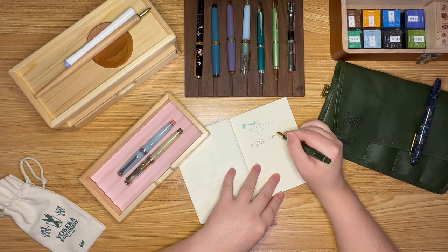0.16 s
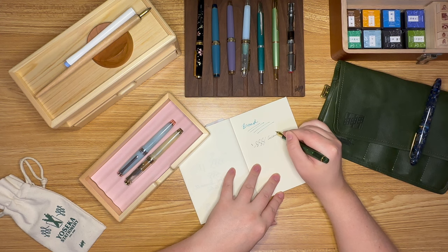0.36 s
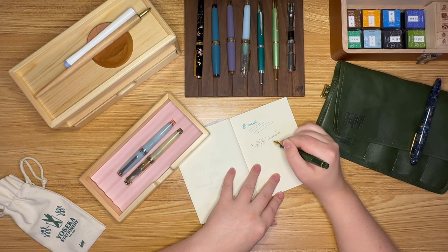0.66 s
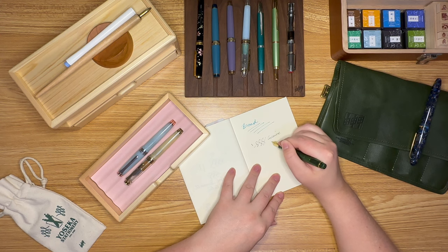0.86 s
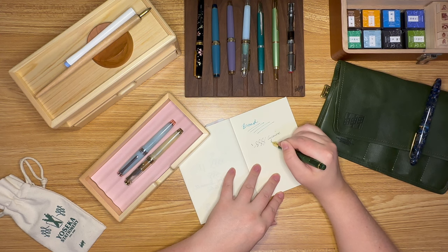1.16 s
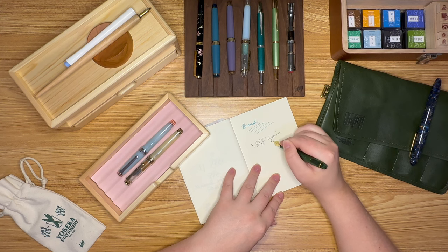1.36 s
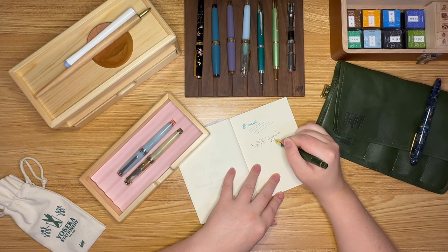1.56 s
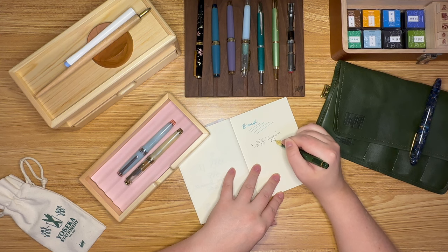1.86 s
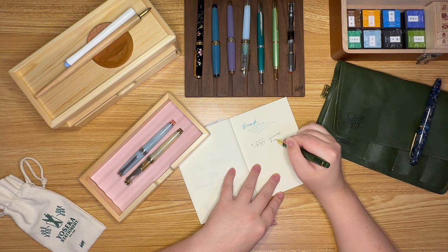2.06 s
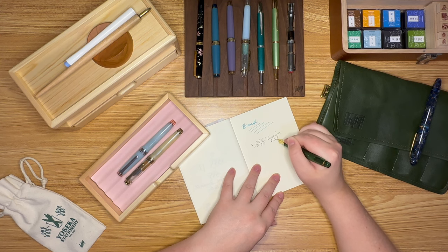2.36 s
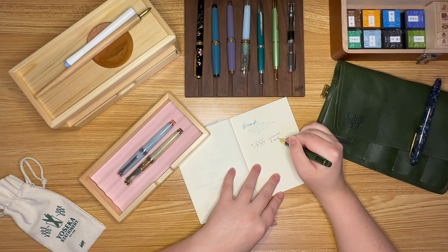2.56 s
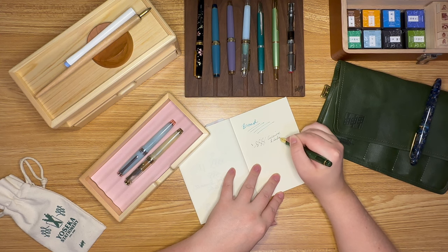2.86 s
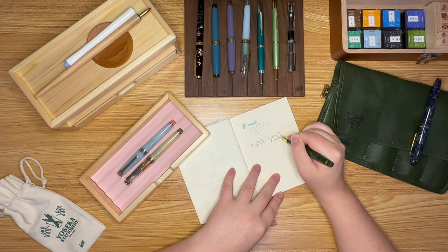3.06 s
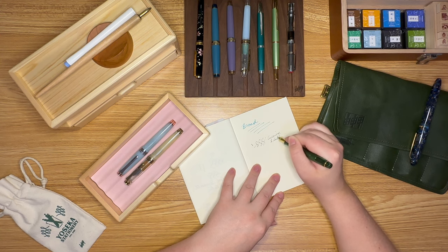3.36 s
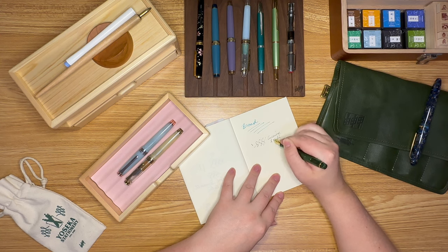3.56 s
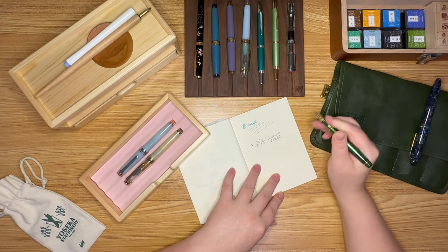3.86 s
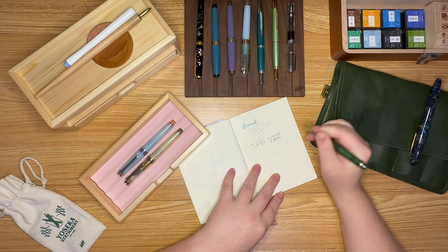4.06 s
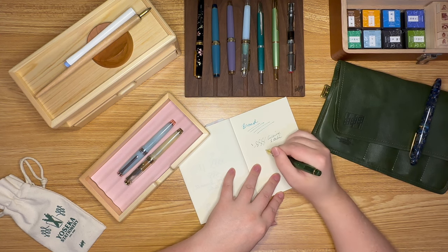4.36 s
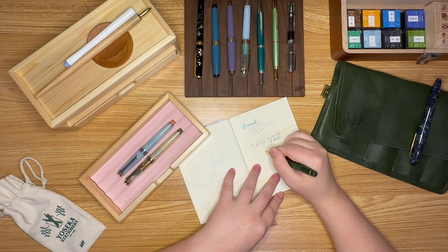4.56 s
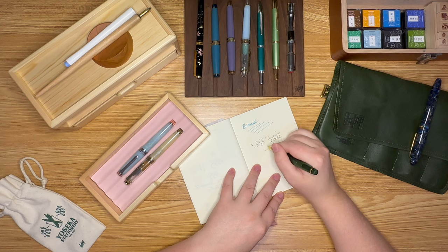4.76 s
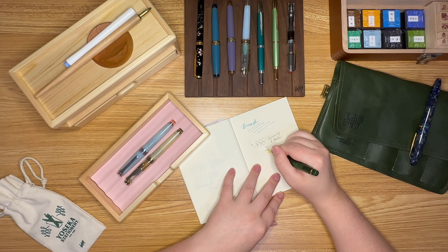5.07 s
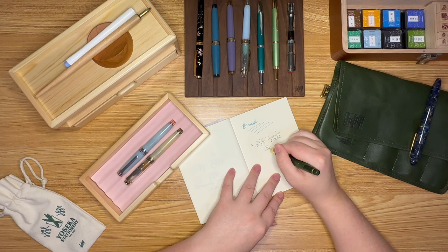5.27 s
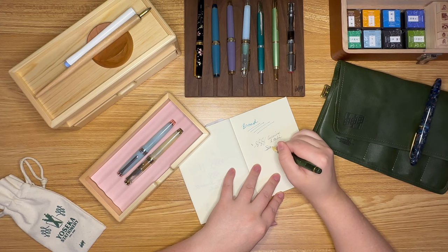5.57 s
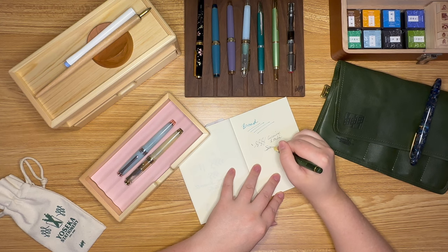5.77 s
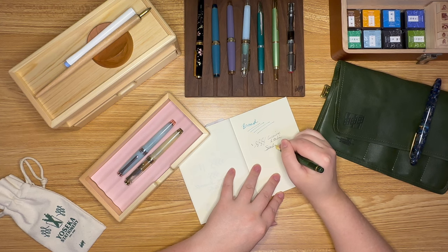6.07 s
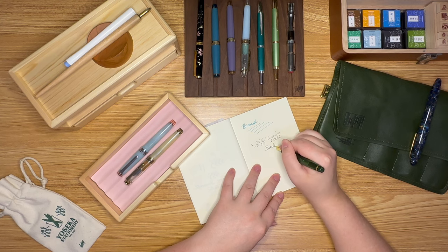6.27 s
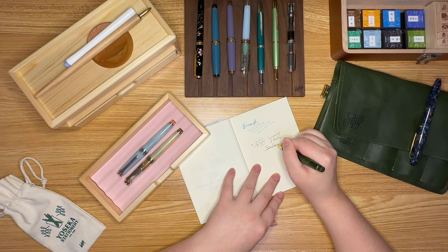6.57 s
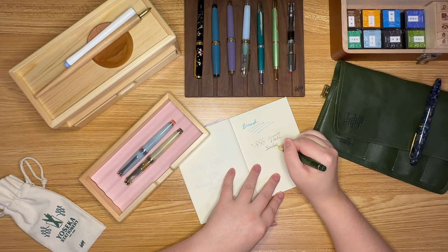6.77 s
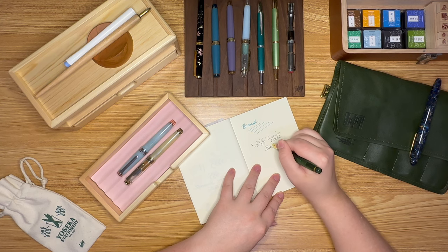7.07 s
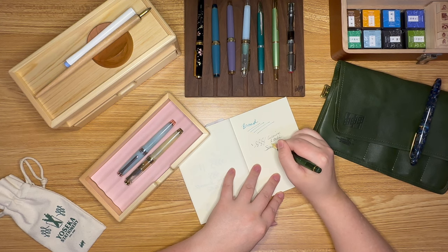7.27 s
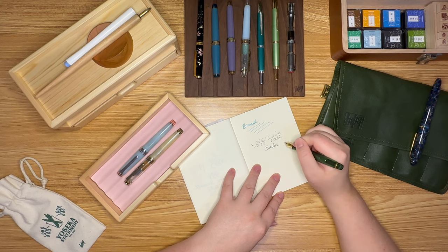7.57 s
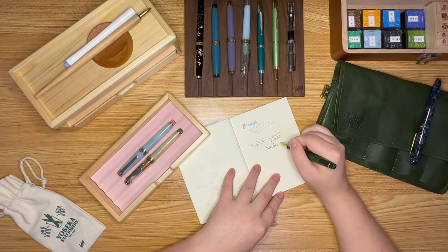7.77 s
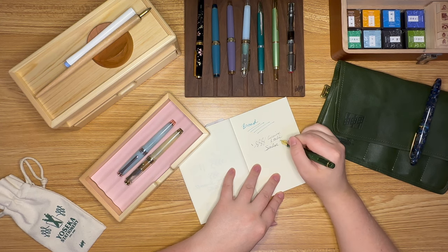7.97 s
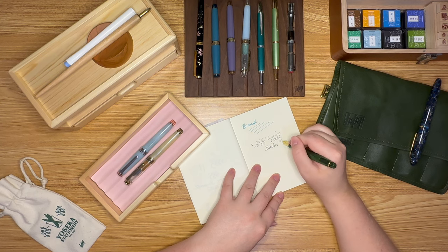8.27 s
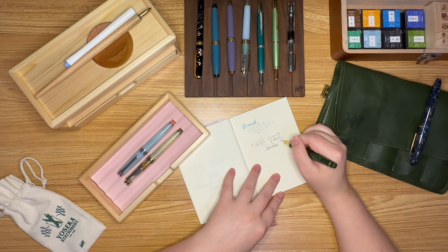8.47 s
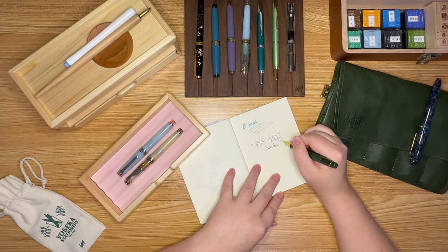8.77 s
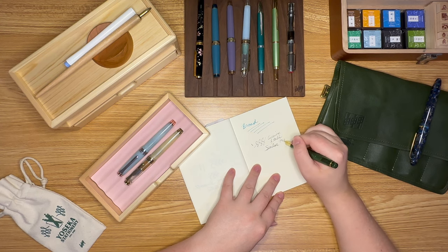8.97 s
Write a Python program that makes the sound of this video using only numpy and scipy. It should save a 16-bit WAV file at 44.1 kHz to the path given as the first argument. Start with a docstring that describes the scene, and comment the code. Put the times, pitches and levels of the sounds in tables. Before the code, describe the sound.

A pen nib scratches short strokes on notebook paper in a quiet room with a low fan hum, dull knocks and a brief dropout.

```python
"""A steel nib writes in a notebook on a wooden desk, in a quiet room with a humming fan throughout.
First come short scratchy strokes among dull knocks of pen and knuckles, then the hand slides over the page.
A second run of strokes follows, with another slide; near 7.5 s the sound drops out with a pop.
It soon returns, and strokes continue to the end. Random clicks, for the nib tripping over paper fibres,
ring the nib, page and desk; knocks are fading tones, slides are rubbing clicks, the fan is sine tones."""
import sys
import numpy as np
from scipy import signal
from scipy.fft import rfft, irfft, next_fast_len
from scipy.io import wavfile
from scipy.ndimage import uniform_filter1d

SR = 44100
rng = np.random.default_rng(int(sys.argv[2]) if len(sys.argv) > 2 else 0)


def master(y):
    """Save y as 16-bit WAV."""
    cut = np.clip(np.atleast_2d(y).T, -1, 1)
    pcm = np.round(cut * 32767)  # scale
    wavfile.write(sys.argv[1], SR, pcm.astype(np.int16))


N = 402626  # length in samples

# Tones from the turning fan shaft. Each row: multiple of the turning rate, average level in dB.
SHAFT_TONES = [(1.037, -47), (2, -63.5), (2.98, -56), (4.03, -58), (4.957, -56), (6.08, -55), (6.97, -53.5),
               (10.96, -51.5), (13, -58), (14.16, -71.5), (9.14, -62.5), (16.15, -65), (18, -67),
               (22.1, -72), (25.7, -78.5), (27.3, -77.5), (29.1, -81)]
SHAFT_HZ = 14.071  # turning rate
# Tones from a second motor and the mains. Each row: pitch in Hz, average level in dB.
MOTOR_AND_MAINS = [(17.65, -51.5), (35.29, -67), (119.97, -57), (257.6, -65), (479.9, -74), (608.3, -72)]
# Moving air and microphone hiss. Each row: frequency in Hz, level in dB per Hz.
AIR_COLOUR = [(10, -73.5), (30, -81), (60, -74.5), (125, -67), (160, -76), (240, -78), (290, -88.5),
              (450, -89), (610, -90.5), (720, -92.5), (1500, -99), (3000, -106), (7000, -112),
              (15000, -114)]

# The hand sliding over the page, one list per slide. Each row: time in seconds, level in dB.
HAND_SLIDES = [
    [(3.64, -75), (3.7, -60), (3.8, -63), (3.9, -64.5), (4.0, -64.5), (4.05, -59), (4.12, -71), (4.24, -73),
     (4.28, -63), (4.4, -78)],
    [(6.84, -81), (7.0, -71), (7.2, -63.5), (7.3, -67), (7.4, -59.5), (7.5, -67), (7.72, -69.5),
     (7.85, -86)],
]
# The page resonance under each slide. Each entry: pitch in Hz.
SLIDE_PAGE_HZ = [1914, 1530]
# Resonances of skin on paper. Each row: centre in Hz, width in Hz, relative level in dB.
SKIN_MODES = [(1070, 1440, 3), (2530, 600, -1), (4530, 4300, -12)]

# Pen and knuckles touching down. Each row: start in seconds, level in dB,
# sharp tick setting in dB against that level, knock pitch in Hz.
TOUCHES = [(0.248, -40, -23, 1010), (0.259, -38, -25, 910), (0.788, -48.5, -21, 910),
           (1.313, -47.5, -20, 850), (2.901, -35, -31, 1400), (3.159, -43, -17, 1160),
           (3.288, -57, -21, 610), (3.539, -45.5, -19, 810), (3.66, -43.5, -2, 1480),
           (3.673, -41, -11, 1580), (3.771, -54.5, -9, 2620), (3.994, -53, -18, 1920),
           (4.036, -54, -31, 905), (4.052, -41.5, -31, 686), (4.558, -47, -17, 900),
           (4.689, -49, -7.5, 4260), (6.704, -44, -22, 1630), (7.346, -53.5, -13, 4170)]

# Pen strokes; heavy ones load the desk and damp the nib. Each row: middle in seconds,
# length in seconds, page level in dB, relative pressure in dB.
PEN_STROKES = [(0.005, 0.034, -48, 0.5), (0.892, 0.073, -54.5, 1.5), (0.968, 0.039, -56, -2.5),
               (1.067, 0.073, -53.5, 2), (1.165, 0.041, -57, -1.5), (1.406, .091, -51, -2.5),
               (1.562, 0.086, -53.5, 0), (1.677, 0.085, -57, -2), (1.805, 0.098, -59.5, 0),
               (1.926, 0.067, -58.5, -1.5), (2.123, .108, -51, 0), (2.294, 0.085, -49.5, 2),
               (2.403, 0.056, -53, -0.5), (2.529, 0.035, -56, 5.5), (2.641, 0.059, -53, -0.5),
               (2.81, .068, -61, 2), (2.896, 0.049, -52, 5), (2.936, 0.049, -46.5, 0),
               (3.24, 0.096, -65.5, 1.5), (3.606, 0.048, -45.5, 1), (4.668, 0.093, -47, -2),
               (4.752, 0.1, -46, -1.5), (4.871, 0.051, -40, 1.5), (4.972, 0.1, -50, -1.5),
               (5.1, 0.089, -48.5, -4.5), (5.247, 0.11, -52.5, -0.5), (5.355, 0.065, -49, -3),
               (5.472, 0.053, -50, 2), (5.554, .076, -54, -5), (5.693, 0.075, -51, 1.5),
               (5.793, 0.071, -45, -1.5), (5.942, 0.078, -47, -0.5), (6.036, 0.082, -52.5, -3.5),
               (6.163, .067, -56, -2.5), (6.219, 0.065, -54, 3), (6.281, 0.071, -53, -4),
               (6.33, .072, -53.5, -2.5), (6.451, 0.058, -49.5, 2), (6.539, 0.06, -48.5, -3),
               (6.74, 0.085, -48, -0.5), (6.791, 0.04, -47.5, -3.5), (7.345, 0.021, -52, 0),
               (7.96, 0.079, -53.5, 1), (8.039, .064, -52.5, 0), (8.173, 0.086, -52.5, 0.5),
               (8.258, 0.037, -49.5, 1), (8.374, 0.041, -53, 0.5), (8.74, 0.054, -57.5, 5.5),
               (8.819, .086, -52.5, 2.5), (8.948, 0.15, -57, 3), (9.028, 0.084, -53, 2.5),
               (9.121, .026, -54, 3.5)]
# Each word's nib angle. Each row: first second it applies, then levels of tip, tines and desk
# in dB against the page.
NIB_ANGLES = [(0, -4.5, -11.5, 1), (4.4, -10.5, -13.5, -0.5), (7.7, -6, -8.5, 1)]
# Resonances of the nib's tip. Each row: centre in Hz, width in Hz, relative level in dB.
TIP_MODES = [(7510, 250, -5.5), (8620, 940, -3), (9540, 690, -1.5), (11000, 1520, -7), (12310, 900, -6.5),
             (13100, 1400, -11.5), (14800, 1800, -17)]
# Resonances of the nib's tines. Each row: centre in Hz, width in Hz, relative level in dB.
TINE_MODES = [(4480, 780, 0), (5020, 380, -2), (6104, 350, 3), (6424, 410, 2.5)]
# Resonances of the page. Each row: centre in Hz, width in Hz, relative level in dB.
PAGE_MODES = [(1405, 163, 1.5), (1625, 201, 1), (1833, 154, 1), (2195, 162, -4.5), (2620, 194, -9.5),
              (3295, 730, -14.5), (3877, 240, -13)]
# Resonances of the desk. Each row: centre in Hz, width in Hz, relative level in dB.
DESK_MODES = [(329.3, 102, -2.5), (606, 61, 0), (695.6, 60, 3.5), (853, 120, -0.5), (1043, 82, -0.5),
              (1222, 206, 0)]

FIBRES_PER_S, FIBRE_SCATTER_DB = 9000, 0.5
NIB_DB_PER_PRESSURE_DB, DESK_DB_PER_PRESSURE_DB = -0.94, 0.84
# Light strokes leave only the rasp near 2 kHz, so the rest of the page follows the pressure.
RASP_DB, REST_OF_PAGE_DB, REST_OF_PAGE_DB_PER_PRESSURE_DB = -3.5, -2, 0.42
EDGE_DB, SQUARENESS = -6.5, 2.64  # level at both ends of a stroke; how flat its middle is
RISE_SHARE = 0.57  # strokes speed up more slowly than they stop
LAG_SHARE = 0.044  # the weight arrives late, as a share of the stroke length

ROOM_TOP_HZ, ROOM_FADE_S, ROOM_DB = 4260, 0.17, -12.0  # the fade time is for a 60 dB fall
DROP_S, BACK_S = 7.4997, 7.6808  # the sound goes and returns
OFFSET, TOP_HZ = -.0016, 15750  # constant shift off zero; upper limit of the sound


def amp(db):
    """Turn decibels into a plain multiplier."""
    return 10 ** (np.asarray(db) / 20)


def unit(x):
    """Scale a sound to an average (RMS) level of 1."""
    return x / np.sqrt(np.mean(x ** 2))


def walk(rate):
    """Wandering level: random values held 1 / rate seconds and smoothed twice."""
    hold = int(SR / rate)
    steps = np.repeat(rng.standard_normal(N // hold + 1), hold)
    smooth = uniform_filter1d(uniform_filter1d(steps, hold), hold)
    return 1.3 * smooth[:N]


def band(x, hz, width):
    """A steep resonance that keeps only sound near its centre, where the gain is 1."""
    edges = [hz - width / 2, hz + width / 2]
    return signal.sosfilt(signal.butter(2, edges, "bandpass", fs=SR, output="sos"), x)


def ring(x, modes, shift_db):
    """Power-balanced resonances; each swells and fades as the point of contact moves."""
    power = sum(amp(db) ** 2 * width for _, width, db in modes) * 2 / SR
    total = 0
    for hz, width, db in modes:
        moving = x * amp(shift_db * walk(12))
        total = total + amp(db) * band(moving, hz, width)
    return total / np.sqrt(power)


def fibres(rate, scatter_db):
    """Dense clicks of uneven size as a surface catches on paper fibres."""
    caught = rng.random(N) < rate / SR
    size = rng.standard_normal(N) * amp(scatter_db * rng.exponential(size=N))
    return unit(caught * size)


def hum():
    """Fan, second motor and mains: steady tones that waver a little in level."""
    t, total = np.arange(N) / SR, np.zeros(N)
    tones = [(SHAFT_HZ * multiple, db) for multiple, db in SHAFT_TONES] + MOTOR_AND_MAINS
    for hz, db in tones:
        level = np.sqrt(2) * amp(db + 1.25 * walk(3))
        total += level * np.sin(2 * np.pi * (hz * t + rng.random()))
    return total


def air():
    """Noise with the colour of the room's background, breathing slightly in level."""
    size = next_fast_len(N)
    hz, db = np.transpose(AIR_COLOUR)
    bins_hz = np.arange(size // 2 + 1) * SR / size
    colour_db = np.interp(np.log(bins_hz + 1), np.log(hz), db)
    spectrum = rfft(rng.standard_normal(size)) * amp(colour_db) * np.sqrt(SR / 2)
    return irfft(spectrum, size)[:N] * amp(1.3 * walk(2.395))


def hand():
    """Skin rubs softly on paper, as dense clicks; one page resonance sings along."""
    t, out = np.arange(N) / SR, np.zeros(N)
    rub = fibres(12000, 1.2) * amp(1.2 * walk(25))
    for slide, page_hz in zip(HAND_SLIDES, SLIDE_PAGE_HZ):
        times, levels_db = np.transpose(slide)
        drag = rub * amp(np.interp(t, times, levels_db, left=-200, right=-200))
        out += ring(drag, SKIN_MODES + [(page_hz, 160, 5.5)], 1.1)
    return out


def taps():
    """A short dull knock: a fading tone and a noisy rattle, with a sharp tick on its front."""
    out, t = np.zeros(N), np.arange(2000) / SR
    for start_s, db, tick_db, hz in TOUCHES:
        noise = rng.standard_normal(len(t))
        swell = 1 - np.exp(-t / 0.00034)
        knock = np.sin(2 * np.pi * hz * t) * np.exp(-t / 0.0031) * swell * 1.47
        rattle = band(noise * np.exp(-t / .006), 1.15 * hz, .8 * hz) * 1.5
        tick = band(noise * np.exp(-t / 0.0014), 7300, 6800) * 2.8 * amp(tick_db)
        first = int(start_s * SR)
        out[first:first + len(t)] += amp(db) * (knock + rattle + tick)
    return out


def nib():
    """Each stroke speeds up and slows down; fibre clicks ring the tip, tines, page and desk."""
    t = np.arange(N) / SR
    powers = np.zeros((5, N))  # tip, tines, page rasp, rest of page, desk
    late = np.array([[0], [0], [0], [1], [1]])  # only the last two parts lag
    for middle_s, length, db, pressure in PEN_STROKES:
        _, tip, tines, desk = [word for word in NIB_ANGLES if word[0] <= middle_s][-1]
        damp = NIB_DB_PER_PRESSURE_DB * pressure
        rest_of_page = REST_OF_PAGE_DB + REST_OF_PAGE_DB_PER_PRESSURE_DB * pressure
        load = DESK_DB_PER_PRESSURE_DB * pressure
        parts_db = db + np.array([tip + damp, tines + damp, RASP_DB, rest_of_page, desk + load])
        near = slice(max(int((middle_s - 2 * length) * SR), 0), int((middle_s + 2 * length) * SR))
        middles = middle_s + LAG_SHARE * length * late
        # Distance from the loudest moment: 0 there, 1 at either end of the stroke.
        since = (t[near] - middles) / length + .5 - RISE_SHARE
        away = np.maximum(-since / RISE_SHARE, since / (1 - RISE_SHARE))
        powers[:, near] += amp(parts_db[:, None] + EDGE_DB * away ** SQUARENESS) ** 2
    gains = np.sqrt(powers) * amp(1.82 * walk(60))  # the grain of the paper is patchy
    clicks = fibres(FIBRES_PER_S, FIBRE_SCATTER_DB)
    rasp_modes, rest_modes = PAGE_MODES[2:4], PAGE_MODES[:2] + PAGE_MODES[4:]
    bodies = (TIP_MODES, TINE_MODES, rasp_modes, rest_modes, DESK_MODES)
    return sum(ring(clicks * gain, modes, 1.83) for gain, modes in zip(gains, bodies))


def room_echoes(dry_sound):
    """Echoes of a small room: fading noise, softened in the treble, smears the sound."""
    t = np.arange(SR // 4) / SR
    fade = np.exp(-np.log(1000) * t / ROOM_FADE_S) * (t > .003)  # echoes start after 3 ms
    echoes = rng.standard_normal(len(t)) * fade
    echoes = signal.lfilter(*signal.butter(1, ROOM_TOP_HZ, fs=SR), echoes)
    return signal.fftconvolve(dry_sound, echoes / np.sqrt(np.sum(echoes ** 2)))[:N]


def scene():
    """Add the hum and air to the sounds at the desk and their echoes."""
    at_desk = hand() + taps() + nib()
    return (hum() + air() + at_desk + amp(ROOM_DB) * room_echoes(at_desk))[None]


def record(dry):
    """The input sits slightly off zero; it drops out with a pop that drains away, then returns."""
    t = np.arange(N) / SR
    since = np.maximum(t - DROP_S, 0)
    live = np.where(t < DROP_S, 1, np.clip((t - BACK_S) / .001, 0, 1))  # returns over 1 ms
    drain = .0055 * np.exp(-since / .01)
    spike = .05 * (np.exp(-since / .0003) - np.exp(-since / .00005))
    pop = (t >= DROP_S) * (drain - spike)
    top_cut = signal.ellip(10, .2, 65, TOP_HZ, fs=SR, output="sos")
    return signal.sosfilt(top_cut, (dry + OFFSET) * live + pop)


dry = scene()
out = record(dry)
master(out)
```